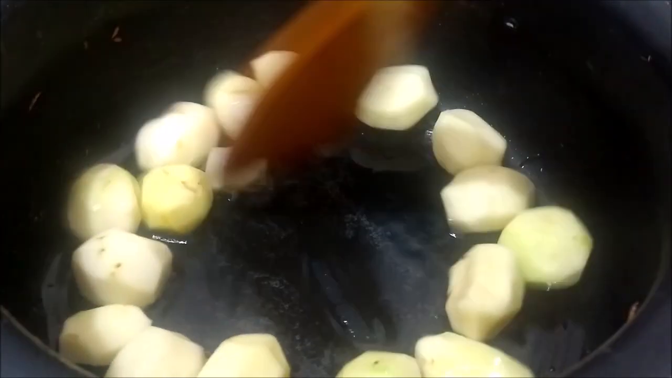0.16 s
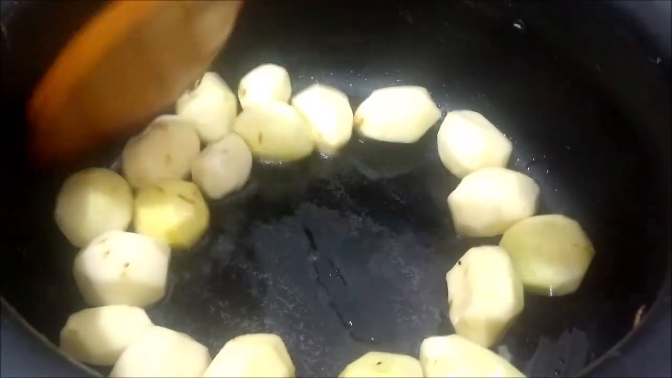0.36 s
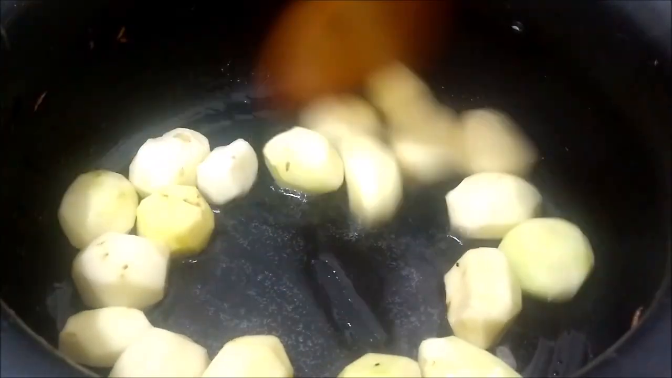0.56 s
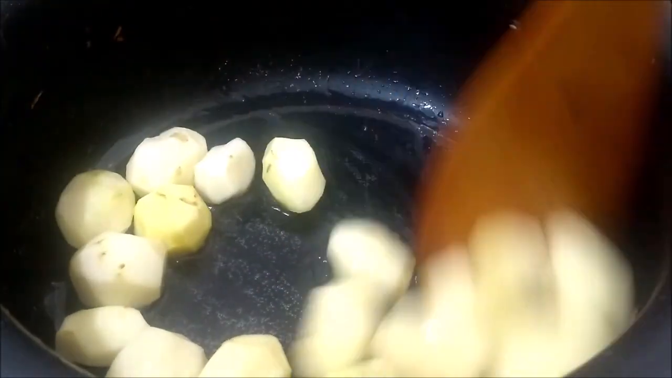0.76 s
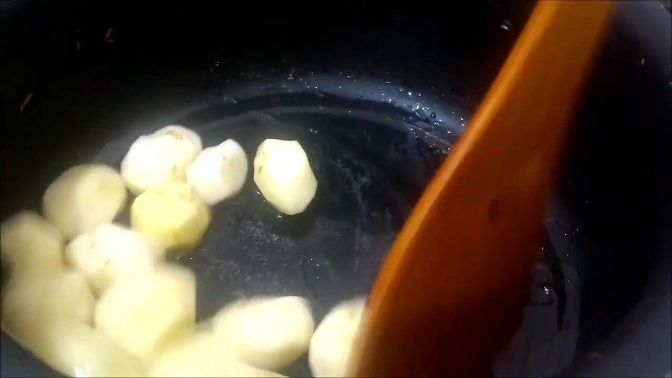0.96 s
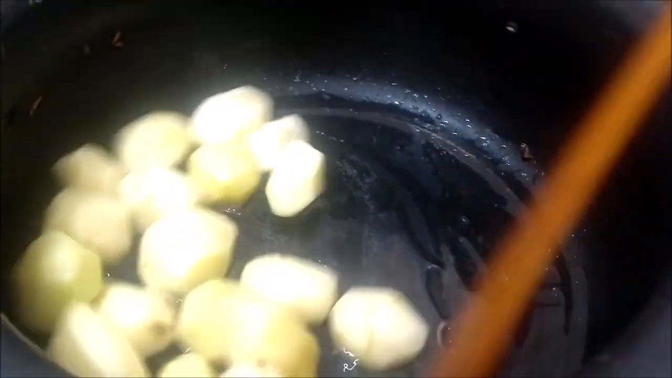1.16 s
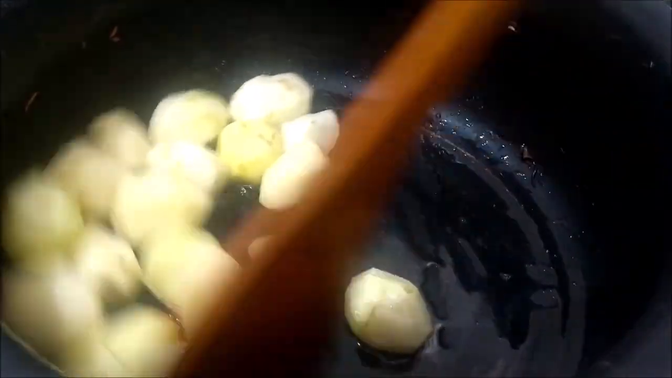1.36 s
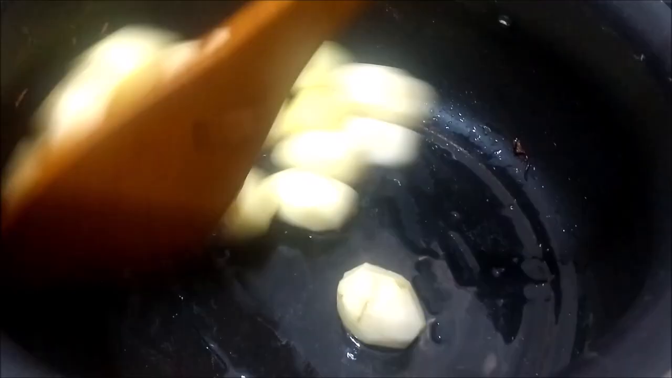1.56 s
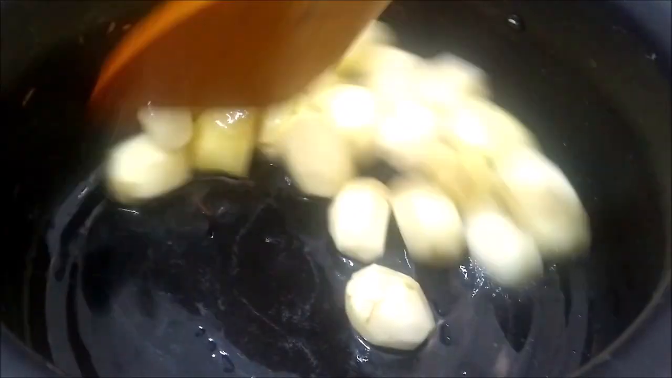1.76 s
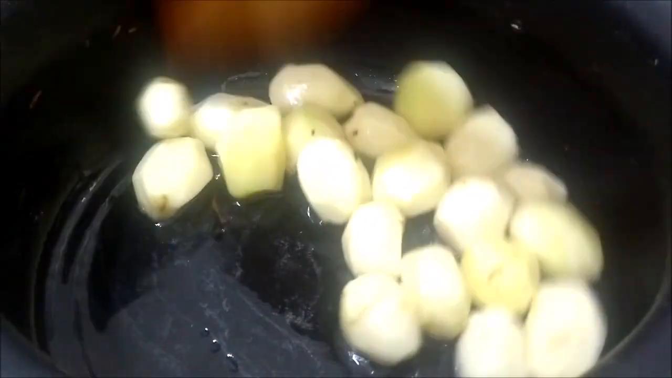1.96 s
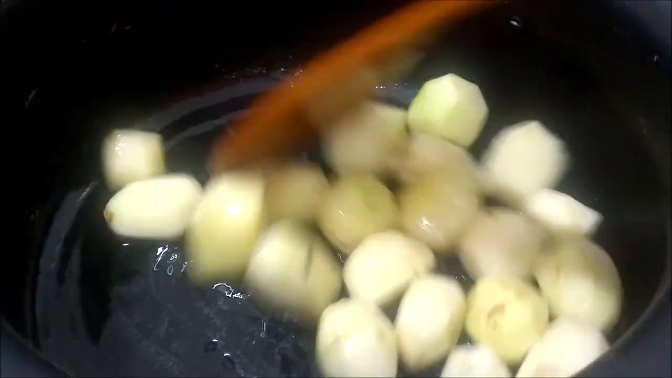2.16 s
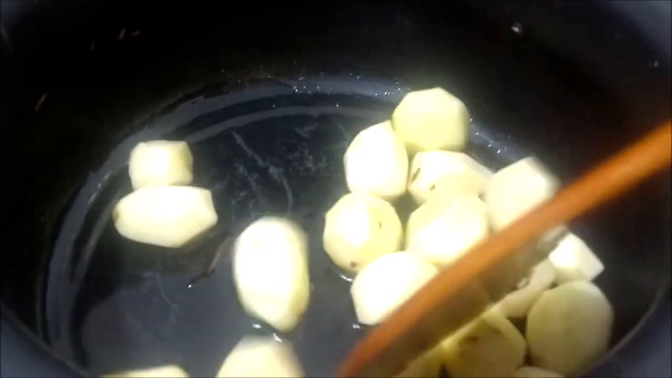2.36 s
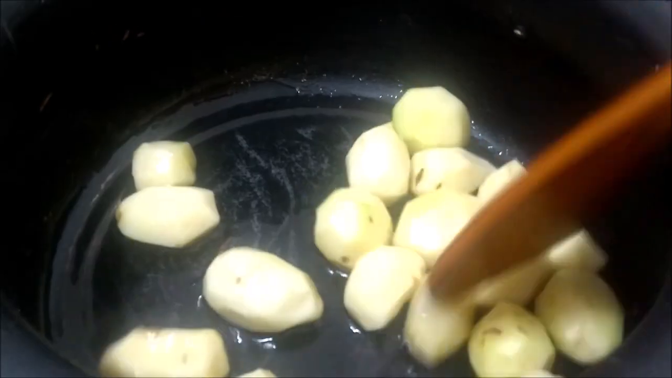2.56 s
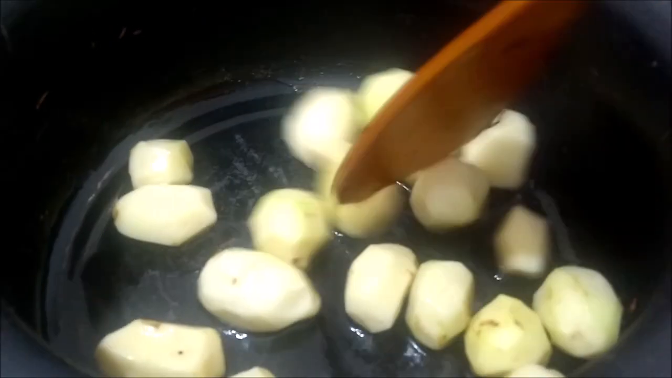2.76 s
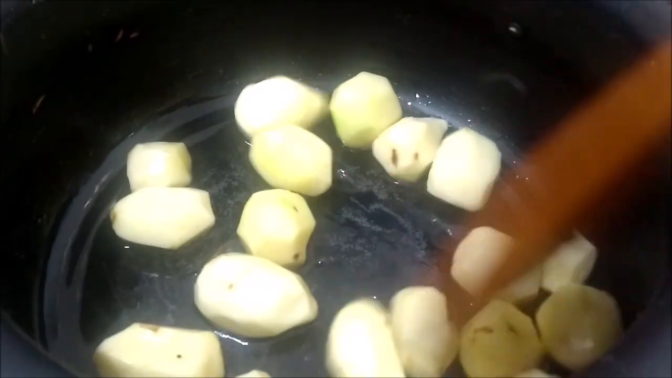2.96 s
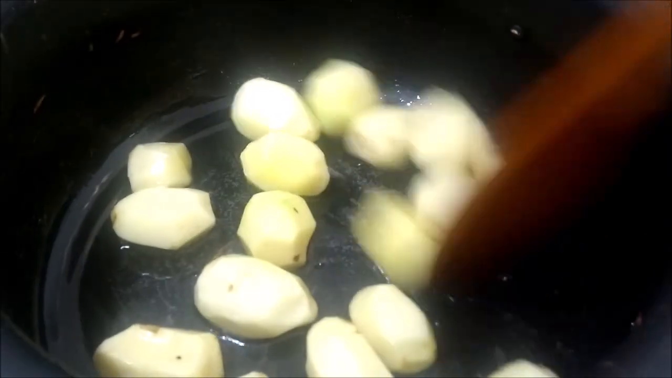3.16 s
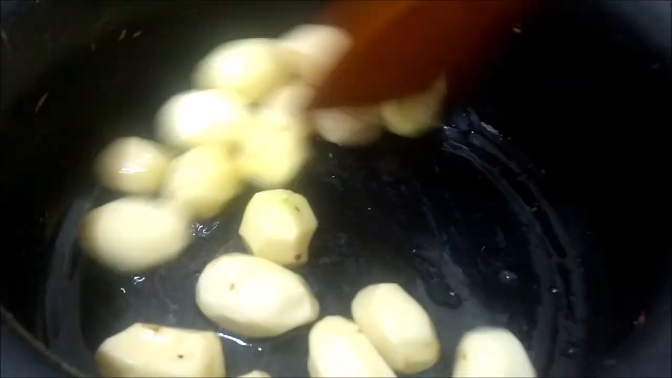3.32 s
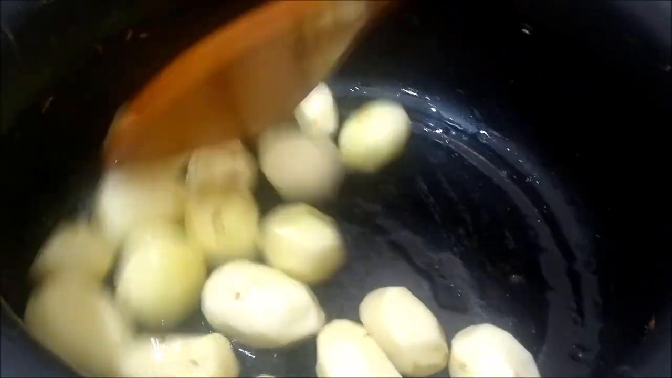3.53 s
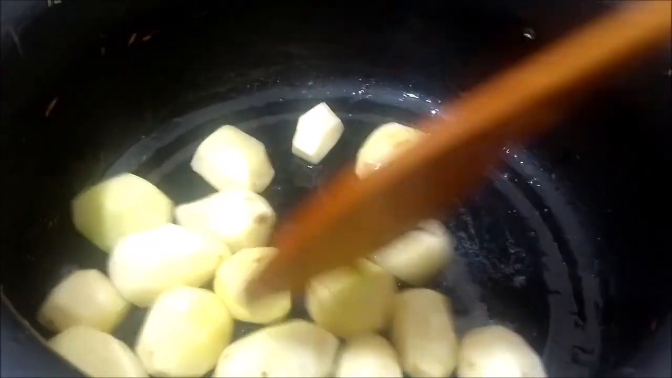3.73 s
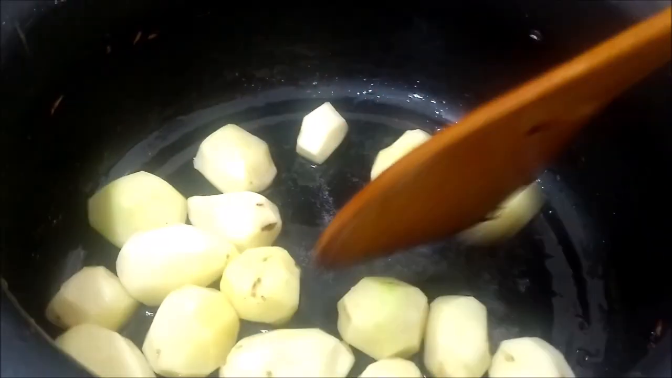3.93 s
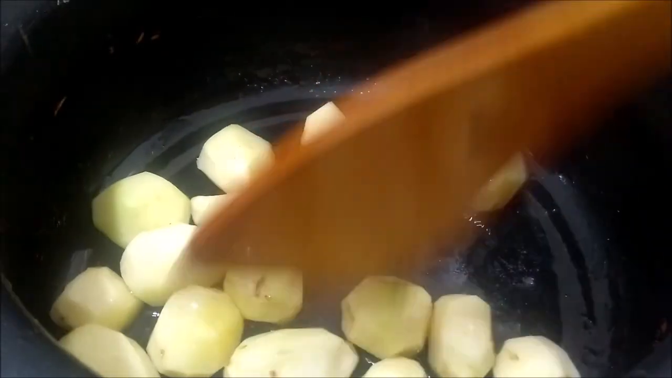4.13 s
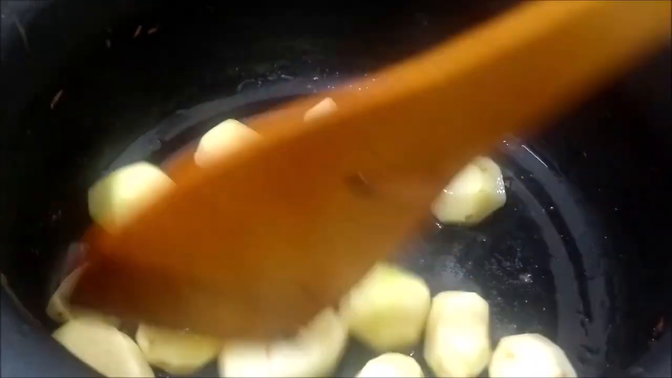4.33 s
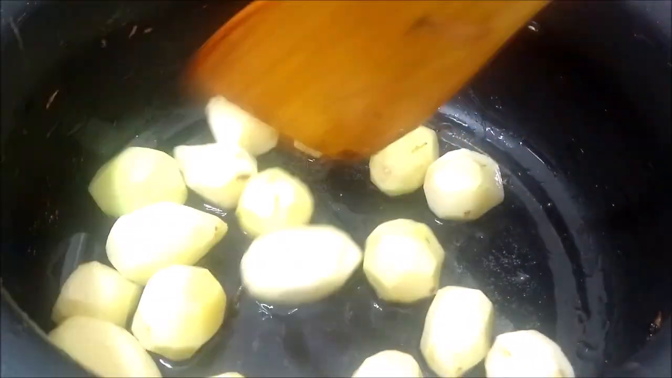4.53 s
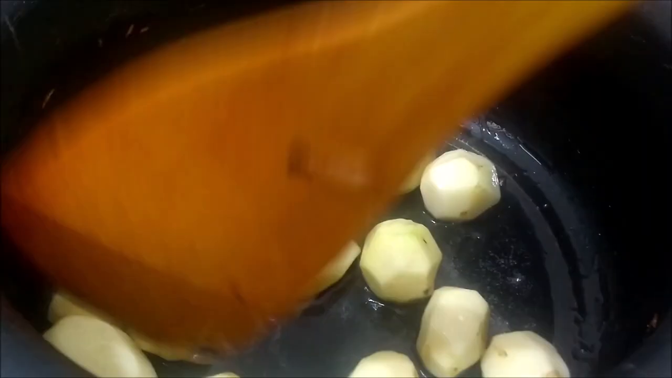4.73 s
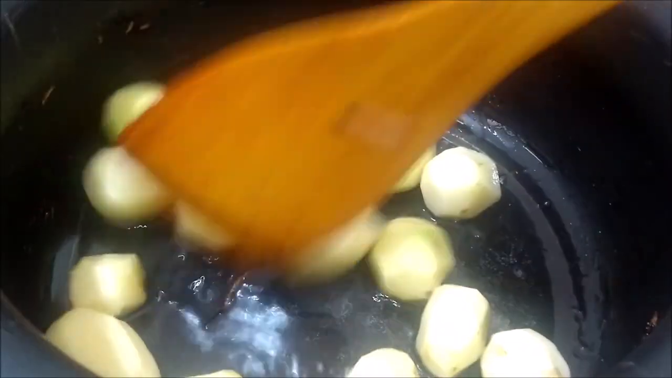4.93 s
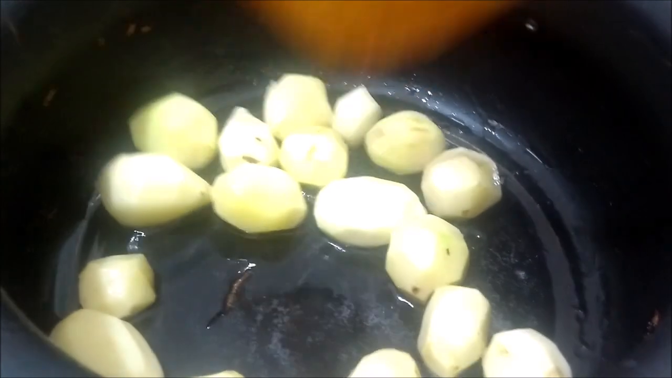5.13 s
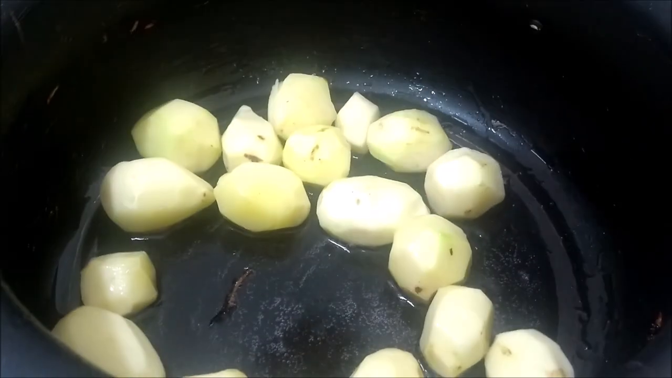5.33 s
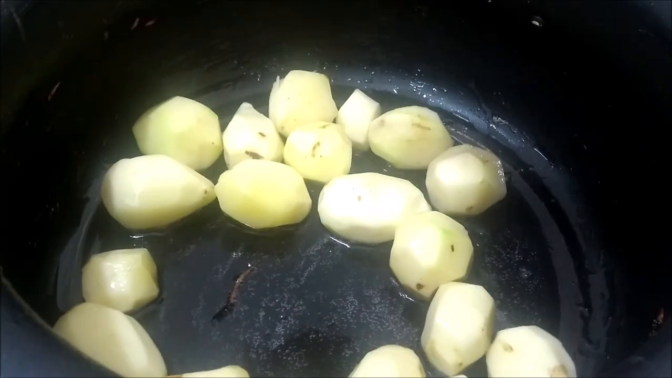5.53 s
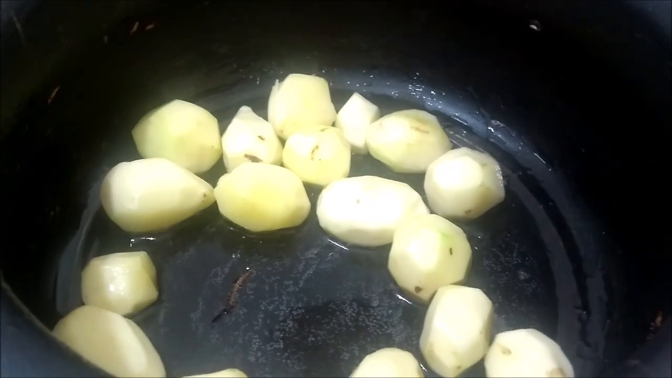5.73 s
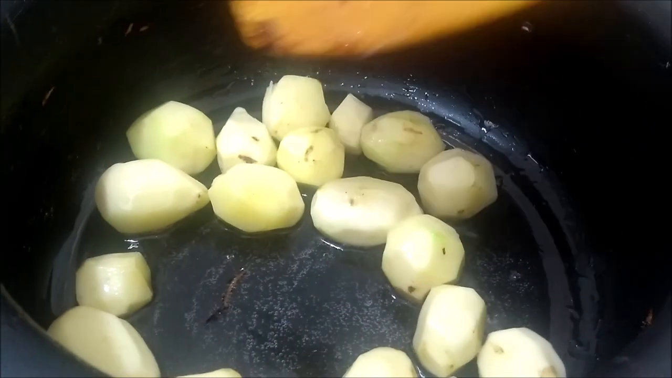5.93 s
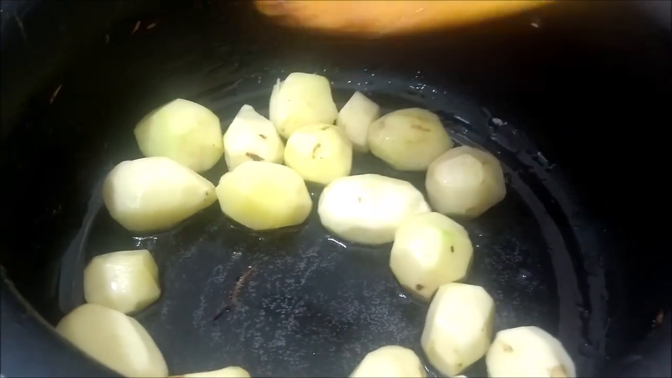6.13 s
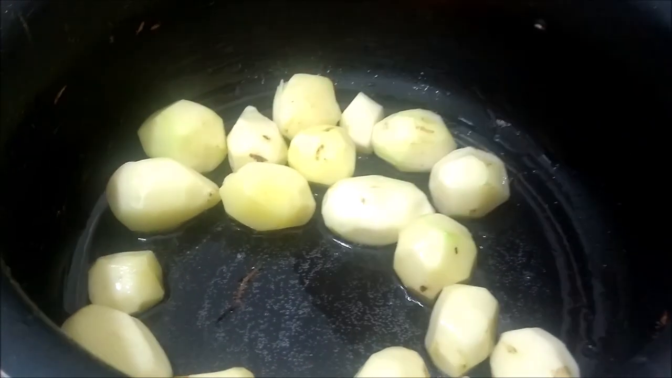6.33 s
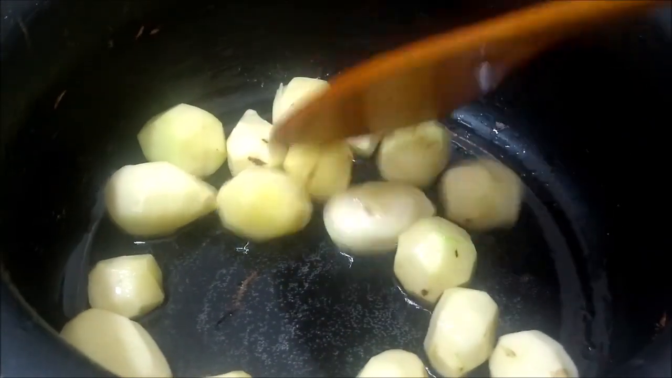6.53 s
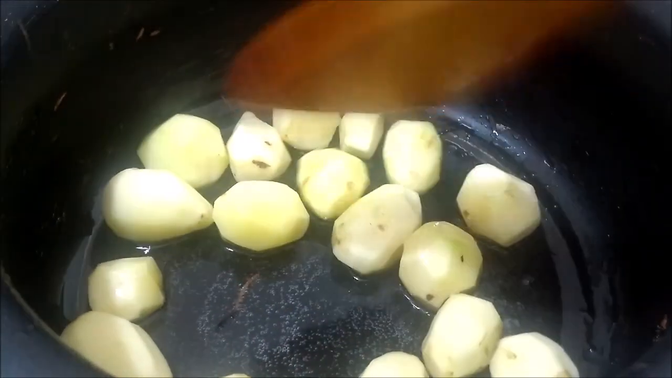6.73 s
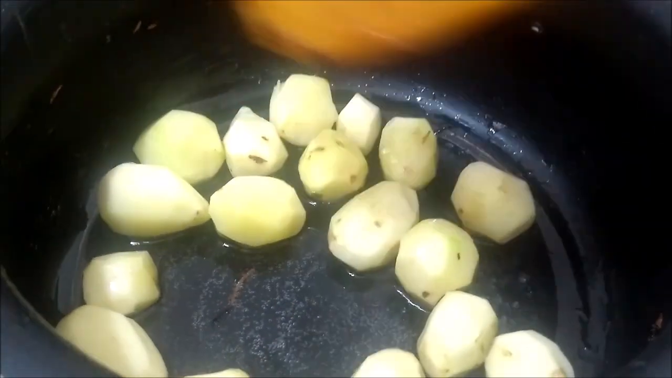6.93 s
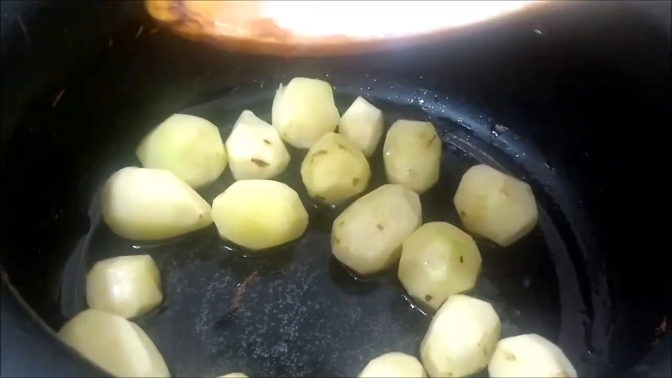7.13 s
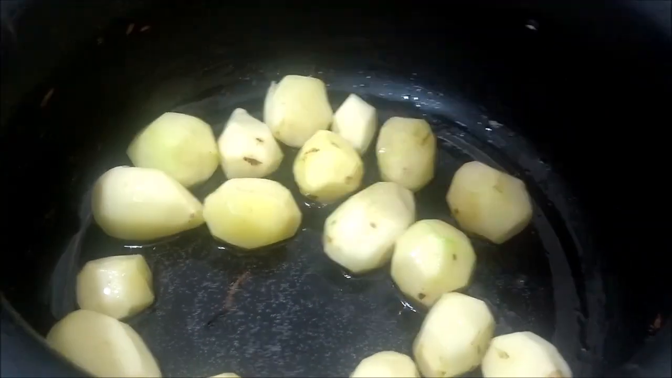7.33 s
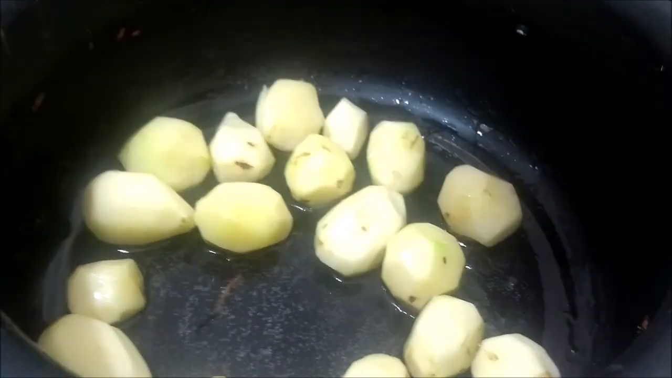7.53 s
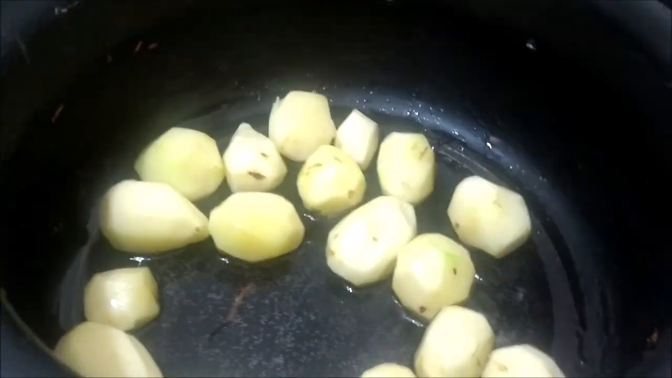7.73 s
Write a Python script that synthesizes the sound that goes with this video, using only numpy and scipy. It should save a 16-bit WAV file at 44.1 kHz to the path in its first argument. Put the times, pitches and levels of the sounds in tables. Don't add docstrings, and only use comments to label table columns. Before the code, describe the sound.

Potatoes fry in hot oil with a dense, crackling sizzle while a wooden spatula knocks and scrapes the ringing metal pan, close up.

```python
import sys
import numpy as np
from scipy import signal
from scipy.fft import rfft, irfft, next_fast_len
from scipy.io import wavfile
from scipy.ndimage import uniform_filter1d, map_coordinates

SR = 44100
rng = np.random.default_rng(int(sys.argv[2]) if len(sys.argv) > 2 else 0)


def voltage_ratio(level):
    return 10 ** (np.asarray(level, float) / 20)


def file_out(sig):
    cols = np.atleast_2d(sig).T
    lim = np.clip(cols, -1, 1)
    pcm = np.round(lim * 32767).astype(np.int16)
    wavfile.write(sys.argv[1], SR, pcm)


N = 347508


def unit(x):
    return x / np.sqrt(np.mean(x ** 2) + 1e-20)


def along(points, hz):
    f, v = np.transpose(points)
    return np.interp(np.log(hz + 1), np.log(f + 1), v)


def curves(rows):
    s, *cols = np.transpose(rows)
    return [np.interp(np.arange(N) / SR, s, c) for c in cols]


def wobble(knots_per_s):
    knots = rng.standard_normal(int(N * knots_per_s / SR) + 4)
    return map_coordinates(knots, [np.arange(N) * knots_per_s / SR])


def swell(s, rise_s, length_s):
    t = np.arange(N) / SR
    return np.exp(-np.where(t < s, (s - t) / rise_s, (t - s) / length_s) ** 2)


def filtered(x, response):
    m = next_fast_len(N + SR // 2)
    return irfft(rfft(x, m) * response(np.fft.rfftfreq(m, 1 / SR)), m)[..., :N]


def resonances(modes):
    def response(f):
        total = 0
        for k, (hz, width, db) in enumerate(modes):
            loss = 1j * f * width
            total = total + (-1) ** k * voltage_ratio(db) * loss / (hz * hz - f * f + loss)
        return total
    return response


def patchy(patchy_db):
    z = signal.stft(rng.standard_normal((2, N)), nperseg=512)[2]
    field = uniform_filter1d(uniform_filter1d(rng.standard_normal(z.shape[1:]), 10, 0), 7, 1)
    return unit(signal.istft(z * voltage_ratio(patchy_db * unit(field)), nperseg=512)[1][:, :N])


def bubbles(count, centre_hz, spread, cycles, size_db):
    pitch, size, place, stream = rng.random((count, 4)).T[:, :, None]
    hz = np.clip(centre_hz * np.exp(spread * np.log(pitch / (1 - pitch))), 500, 15000)
    t = np.arange(96) / SR
    rise = t * hz / cycles
    level = voltage_ratio(np.minimum(-size_db * np.log(size), 13))
    grain = level * rise * np.exp(-rise * 2) * np.sin(2 * np.pi * hz * t)
    start = (place * (N - 96)).astype(int) + N * (stream < .5)
    return unit(np.bincount((start + np.arange(96)).ravel(), grain.ravel(), 2 * N).reshape(2, N))


def sparse_pushes(share, size_db):
    out = np.zeros(2 * N)
    place, sign, size = rng.random((40000, 3))[:int(share * 2 * N)].T
    push = np.sign(sign - .5) * voltage_ratio(np.minimum(-size_db * np.log(size), 11))
    out[(place * 2 * N).astype(int)] = push
    return unit(out.reshape(2, N))


# (time [s], level [dB], large bubbles over fine [dB])
FRYING = [(0.04, -49, 0), (0.17, -51, -5), (0.78, -39.5, -6.5), (1.18, -39.5, -7), (1.24, -34.5, -7.5),
          (1.41, -37.5, -5.5), (1.68, -30, -5), (2.29, -32, -5.5), (2.46, -36, -4.5), (2.88, -32.5, -6.5),
          (3.01, -36, -4), (3.4, -31, -7), (4.01, -34.5, -6.5), (6.31, -37, -2), (6.61, -34, -3.5),
          (6.68, -37, -5), (7.84, -35, -5.5), (7.88, -33.5, -8)]
# (time [s], rise [dB], length [s])
FLARES = [(0.155, 3, 0.086), (0.326, 2, 0.017), (0.52, 3, 0.19), (0.9, 4, 0.021), (1.26, -1.5, 0.082),
          (1.5, -1.5, .06), (2.838, 1.5, .1), (3.241, 5.5, 0.052), (3.394, 1.5, 0.16), (3.51, 0.5, 0.062),
          (3.563, 1.5, .04), (3.928, 3.5, 0.084), (4.635, 2, 0.034), (4.743, 2, 0.023), (5.17, 0.5, .04),
          (5.49, -0.5, 0.058), (5.758, 5, 0.026), (6.263, 2.5, .05), (6.537, 2.5, .015),
          (6.578, 3.5, 0.059), (6.975, 4, 0.1)]
FLARE_RISE_S, FLARE_LARGE_SHARE = 0.014, 0.56


def frying():
    fizz_db, large_db = curves(FRYING)
    flare_db = sum(db * swell(s, FLARE_RISE_S, length_s) for s, db, length_s in FLARES)
    return fizz_db + large_db + FLARE_LARGE_SHARE * flare_db, fizz_db + flare_db


# (frequency [Hz], density [dB per Hz])
LARGE_FIZZ = [(300, -16.5), (700, -35), (1400, -6.5), (2300, -2.5), (3500, -2), (5200, 0), (7000, -4.5),
              (9500, -23), (14500, -42)]
FINE_FIZZ = [(3000, -70), (5500, -15), (8000, -4), (9500, -4), (11500, 0), (13000, 0), (14500, -6)]


def sizzle():
    large_db, fine_db = frying()
    flare = wobble(24)
    large_flicker_db = 0.3 * flare + 1.1 * wobble(35)
    fine_flicker_db = 0.11 * flare + 0.79 * wobble(30)
    large_bursts = bubbles(count=5000, centre_hz=4510, spread=0.195, cycles=2.7, size_db=3.5)
    fine_bursts = bubbles(count=16000, centre_hz=10430, spread=0.14, cycles=2.6, size_db=-0.5)
    large = patchy(patchy_db=1.5) + voltage_ratio(-13.5) * large_bursts
    fine = patchy(patchy_db=2.1) + voltage_ratio(-8) * fine_bursts
    large = unit(filtered(large, lambda f: voltage_ratio(along(LARGE_FIZZ, f))))
    fine = unit(filtered(fine, lambda f: voltage_ratio(along(FINE_FIZZ, f))))
    return voltage_ratio(large_db + 4.0 + large_flicker_db) * large + voltage_ratio(fine_db + 2.0 + fine_flicker_db) * fine


# (time [s], peak [dB], pitch [Hz])
SPITS = [(0.0152, -14, 3000), (0.311, -31, 3290), (0.9076, -19, 12800), (1.253, -21, 11250),
         (2.0157, -14, 7760), (2.5847, -23.5, 3830), (2.8337, -16.5, 11060), (3.0509, -25, 5750),
         (3.1154, -20.5, 5600), (3.2534, -23, 10600), (3.2908, -21, 3770), (3.7099, -19, 10700),
         (3.9204, -26, 12400), (4.3803, -23, 5600), (4.4085, -23, 5500), (4.4604, -20, 5600),
         (4.7423, -23, 3600), (5.0634, -23, 5900), (5.1715, -18, 5640), (5.6606, -26, 3720),
         (5.868, -15.5, 8050), (6.2072, -21, 5520), (6.2483, -22, 3980), (6.46, -19, 8700),
         (6.523, -24, 3400), (6.6167, -21, 5900), (6.8543, -20, 6420), (6.8785, -22, 11500),
         (1.1425, -25.5, 5700), (1.6224, -22, 3870), (2.4939, -32, 5740), (3.1694, -24, 3720),
         (3.5964, -20.5, 3550), (3.8338, -29, 5560), (4.644, -20, 5170), (5.9016, -28, 3670),
         (5.947, -22, 5230), (5.9925, -29, 5630), (6.267, -22.5, 3060), (7.3683, -31, 3440),
         (7.71, -21, 7860)]


def spits():
    out, t = np.zeros((2, N + 900)), np.arange(900) / SR
    for s, db, hz in SPITS:
        tone = np.sin(2 * np.pi * hz * t) * (1 - np.exp(-t / 0.00042))
        tick = tone * voltage_ratio(-60 * t / 0.014) * [[1], [.4]]
        splash = voltage_ratio(-60 * t / 0.016) * uniform_filter1d(rng.standard_normal((2, 900)), size=7) * tone
        out[:, round(s * SR):][:, :900] += voltage_ratio(db + 1.5) * (tick + 2.46 * splash)
    return out[:, :N]


# (time [s], peak [dB], t60 [s], centre [Hz])
SNAPS = [(0.0148, -29, 0.01, 3500), (0.31, -23, 0.025, 4940), (0.513, -26, .012, 2800),
         (0.907, -23, 0.02, 11000), (1.0842, -15, .01, 3000), (1.253, -32, .012, 10000),
         (3.534, -24, .008, 2000), (3.875, -24, 0.0074, 2000), (3.921, -22, .02, 10000),
         (4.7415, -14, .008, 2800), (5.172, -15, 0.007, 5000), (5.762, -16, .006, 11500),
         (5.87, -19, .006, 10500), (6.288, -9.5, 0.0036, 3800), (6.5232, -13, 0.028, 3300),
         (6.53, -10, .006, 6000)]


def snaps():
    out, t = np.zeros((2, N + 1500)), np.arange(1500) / SR
    for s, db, t60_s, hz in SNAPS:
        onset = 1 - np.exp(-t / (0.16 * t60_s))
        shape = voltage_ratio(db + 5.5 - 60 * t / t60_s + np.array([[0], [-3]])) * onset
        band = signal.butter(1, [hz / 3.9, min(hz * 2.2, SR / 2.1)], "band", fs=SR)
        out[:, round(s * SR):][:, :1500] += signal.lfilter(*band, shape * rng.standard_normal((2, 1500)))
    return out[:, :N]


# (time [s], peak [dB], pitch [Hz])
PLOPS = [(0.795, -21.5, 1050), (0.829, -23, 1060), (0.892, -19, 1090), (1.021, -24.5, 1070),
         (1.28, -23, 1060), (1.495, -23, 1050), (1.579, -21.5, 1020), (1.725, -31, 1090),
         (1.827, -26, 1080), (2.084, -23, 1030), (2.14, -25, 1017), (2.228, -23, 1010), (2.272, -25, 1020),
         (2.291, -21, 1030), (2.308, -22, 1050), (2.38, -27, 1060), (2.454, -22, 1084), (2.465, -25, 1080),
         (2.716, -23.5, 1020), (2.936, -31, 1080), (3.334, -38, 1080), (3.429, -28, 1140),
         (3.714, -24, 1017), (3.897, -26, 988), (3.996, -22, 1000), (4.08, -23, 1040), (4.329, -25.5, 1040),
         (4.667, -23, 1070), (4.684, -18.5, 1040), (4.722, -28, 1080), (4.978, -19.5, 1040),
         (5.003, -25, 1050), (5.043, -26, 1040), (5.063, -28, 1045), (5.172, -28, 1060), (5.253, -26, 1080),
         (5.654, -26, 1050), (5.921, -24, 1070), (6.131, -27, 1050), (6.274, -14.5, 1075),
         (6.429, -27, 1110), (6.63, -26, 1036), (6.669, -24.5, 1020), (6.729, -35, 1050),
         (7.212, -21, 1100), (7.271, -26, 1090), (7.369, -35, 1120), (7.635, -21.5, 1090),
         (7.801, -25, 1080)]
PLOP_WIDTH_HZ, PLOP_DUCK_SHARE = 188, 0.69


def plops():
    out, t = np.zeros((2, N + 900)), np.arange(900) / SR
    rise = np.pi * PLOP_WIDTH_HZ * t
    envelope = (rise / 2) ** 2 * np.exp(2 - rise)
    for s, db, hz in PLOPS:
        out[0, round(s * SR):][:900] += voltage_ratio(db - 0.5) * envelope * np.sin(2 * np.pi * hz * t)
    return out[:, :N]


def ducking():
    out = np.ones(N + 900)
    for s, _, _ in PLOPS:
        out[round(s * SR) - 250:][:900] *= 1 - PLOP_DUCK_SHARE * np.hanning(900)
    return out[:N]


# (time [s], wall ring [dB], bowl air [dB], ring centre [Hz], freedom to ring [0-1.3])
KNOCKS = [(0.0148, -4.5, -7, 595, 0.11), (0.085, -25, -32, 580, 0.47), (0.309, -32.5, -42.5, 465, 1),
          (0.5125, -28.5, -26, 430, 0.15), (0.759, -26, -31, 590, 0.7), (0.867, -28, -23.5, 550, 0.1),
          (1.085, -14, -11.5, 480, 0.32), (1.289, -32, -31, 486, 0.8), (1.51, -28.5, -21, 580, 0.35),
          (1.923, -22, -19, 433, 0.65), (2.019, -32, -45, 447, 0.2), (2.108, -28, -23, 490, 0.44),
          (2.36, -27, -19, 430, 0.17), (2.851, -35, -48, 500, 1), (3.027, -24.5, -28.5, 365, 0.6),
          (3.279, -28.5, -47, 415, 0.2), (3.498, -25, -30, 395, 0.5), (3.533, -18.5, -23, 385, 0.12),
          (3.874, -22.5, -31, 535, 0.56), (4.374, -43, -28.5, 457, 0), (7.455, -33.5, -45, 450, 0.1),
          (4.7422, -17.5, -20, 412, 1.3), (6.524, -20, -35, 480, 0.35)]
# (level re air [dB], centre [Hz], freedom [0-1])
PLOP_WALL = (-19.5, 600, 0.15)


def contacts():
    under_db, centre_hz, free = PLOP_WALL
    rows = [(*row, False) for row in KNOCKS]
    return rows + [(s, db - 1 + under_db, db - 5, centre_hz, free, True) for s, db, _ in PLOPS]


def rattle(column):
    out, t = np.zeros(N + SR), np.arange(SR // 2) / SR
    for row in contacts():
        t60_s = 0.083 + 0.56 * max(row[4], 0)
        out[round(row[0] * SR):][:len(t)] += voltage_ratio(row[column] - 60 * t / t60_s)
    return out[:N]


# (time [s], effort [dB], wall region scraped [Hz])
STIR = [(0.1, -42.5, 563), (0.49, -43, 440), (0.92, -34.5, 506), (1.2, -37, 418), (1.48, -34.5, 535),
        (1.62, -46, 473), (1.81, -39.5, 530), (1.94, -34.5, 435), (2.3, -43.5, 414), (2.82, -45, 480),
        (3.07, -46.5, 411), (3.31, -37.5, 427), (3.82, -41, 496), (4.24, -40.5, 527), (4.63, -42, 540),
        (4.9, -46, 435), (5.39, -46, 470), (7.88, -45.5, 525)]
# (time [s], rise [dB], length [s], wall region [Hz])
RUBS = [(0.328, -7, 0.07, 485), (0.76, -1, .04, 554), (1.12, 3.5, .07, 427), (1.3, 8, 0.05, 530),
        (1.718, 7, 0.1, 560), (1.992, 2, .1, 400), (2.36, 5, 0.084, 397), (2.862, 5.5, 0.081, 450),
        (3.04, 9.5, 0.2, 396), (3.55, 8, 0.054, 390), (3.607, 9.5, 0.1, 500), (4.34, 9, 0.031, 506),
        (4.904, 5, 0.12, 430), (6.544, 14, 0.12, 445)]
# (time [s], frequency [Hz], level [dB])
AIR = [(0.5, 1105, -2), (0.72, 1030, 1), (0.93, 1165, -0.5), (1.57, 1044, 0), (1.98, 1108, 2),
       (2.2, 996, -2.5), (2.46, 1117, 3.5), (2.8, 983, 2), (2.96, 1092, -1), (3.28, 1047, 0),
       (3.45, 1140, -1.5), (3.68, 1017, 0), (4.4, 1088, 3.5), (4.95, 1015, 0), (5.4, 1082, 1.5),
       (6.42, 1071, 0), (6.67, 993, 3), (7.0, 1084, 3.5)]
RUB_RISE_S, AIR_DRIFT_HZ, REGION_DRIFT_HZ = 0.008, 26, 24.8


def stirring():
    (effort_db, region_hz), (air_hz, _) = curves(STIR), curves(AIR)
    region_hz = region_hz + REGION_DRIFT_HZ * wobble(6)
    for s, db, length_s, hz in RUBS:
        shape = swell(s, RUB_RISE_S, length_s)
        effort_db = effort_db + db * shape
        region_hz = region_hz + (hz - region_hz) * shape
    return effort_db, region_hz, air_hz + AIR_DRIFT_HZ * wobble(7)


# (frequency [Hz], width [Hz], level [dB])
BOWL = [(561, 123, -11.5), (972, 180, -7.5), (1102.5, 49, 3.5), (1615, 26, -11.5), (2634, 24, -10.5)]
HUM_MEAN_DB, HUM_PER_LARGE_DB, HUM_PER_EFFORT_DB = -38, 0.52, 0.062


def bowl_hum(effort_db, air_hz):
    large_db = sum(curves(FRYING))
    hum_db = HUM_MEAN_DB + curves(AIR)[1] + HUM_PER_LARGE_DB * (large_db - large_db.mean())
    hum_db = hum_db + HUM_PER_EFFORT_DB * (effort_db - effort_db.mean())
    push = patchy(patchy_db=1.5) + voltage_ratio(-4.5) * sparse_pushes(share=.004, size_db=1.0)
    main_db = max(db for _, _, db in BOWL)
    lowered = [(hz * 0.942 if db == main_db else hz, width, db) for hz, width, db in BOWL]
    low_air = unit(filtered(push[::-1], resonances(lowered)))
    high_air = unit(filtered(push, resonances(BOWL)))
    turn = np.pi / 2 * np.clip((air_hz - 1000) / 110, .05, .95)
    air = np.cos(turn) * low_air + np.sin(turn) * high_air
    gain = voltage_ratio(hum_db - 1.0 + 0.45 * wobble(25)) + voltage_ratio(-14.0) * rattle(column=2)
    return gain * ducking() * air


# (frequency [Hz], level [dB], t60 [s])
WALL = [(245.5, -18.5, 0.12), (329.8, -5.5, 0.46), (371.7, -6, 0.48), (410.5, -0.5, 0.8), (453, 3, 0.44),
        (510, 4, 0.31), (554, 2.5, 0.25), (667, -10.5, 0.16), (730, -13, 0.09), (1050, -4.5, 0.31),
        (1460, -11.5, 0.083), (1590, -11, .09)]


def wall_scrape(effort_db, region_hz):
    rub = patchy(patchy_db=2.5) + voltage_ratio(-3.5) * sparse_pushes(share=.002, size_db=4.5)
    modes = [(hz, 5 / t60_s, db) for hz, db, t60_s in WALL if hz < 800]
    low = unit(filtered(rub, resonances(modes[:4])))
    high = unit(filtered(rub, resonances(modes[4:])))
    turn = np.pi / 2 * np.clip((region_hz - 340) / 240, .1, .9)
    gain = voltage_ratio(effort_db - 2.5 + 0.9 * wobble(6.2)) + voltage_ratio(-14.0) * rattle(column=1)
    return gain * (np.cos(turn) * low + np.sin(turn) * high)


def pan():
    effort_db, region_hz, air_hz = stirring()
    return bowl_hum(effort_db, air_hz) + wall_scrape(effort_db, region_hz)


CONTACT_S = 0.001227
SETTLE_S, SETTLED_DB_PER_S = 0.12, 104
KNOCK_DAMP_HZ = 58


def knocks():
    out, blows, t = np.zeros((2, N + SR)), np.zeros((2, N)), np.arange(14000) / SR
    hz, level_db, t60_s = np.transpose(WALL)[:, :, None]
    phase = 2 * np.pi * hz * t
    swing = np.array([np.sin(phase), np.cos(phase)]) * (1 - np.exp(-t / 0.0013))
    settled_db = SETTLED_DB_PER_S * np.maximum(t - SETTLE_S, 0)
    for s, ring_db, air_db, centre_hz, free, plop in contacts():
        start, crack_start = round((s + CONTACT_S) * SR), round((s + .6 * CONTACT_S) * SR)
        near_db = -(80 + 500 * free ** 2) * np.log(hz / centre_hz) ** 2
        near_db = np.maximum(near_db, -11 - 8 * free) * (hz < 600)
        fade_db = -60 * t / (t60_s * np.clip(free, .05, 2)) - settled_db
        scatter_db = rng.normal(0, 0.87, (2, len(hz), 1)) + [[[0]], [[-4]]]
        size = voltage_ratio(level_db + near_db + scatter_db) * voltage_ratio(fade_db)
        crack = voltage_ratio(-24.0 - 60 * t[:600] / 0.007) * rng.standard_normal((2, 600))
        out[:, start:][:, :len(t)] += voltage_ratio(ring_db - 3.5 + 2.1 * free) * (size * swing).sum(1)
        out[:, crack_start:][:, :600] += voltage_ratio(max(ring_db, air_db) + 3.0) * crack
        blows[:, start] = voltage_ratio(air_db + 41) * (not plop), voltage_ratio(ring_db + 34.0 - 13 * free)
    damped_air = resonances([(c, width + KNOCK_DAMP_HZ, db) for c, width, db in BOWL])
    puff = lambda f: damped_air(f) / (1 + 1j * f / 2500)
    thud = resonances([(140, 410, -16.0), (480, 450, 2.0), (790, 350, -5), (3000, 320, -37)])
    out[0, :N] += filtered(blows, lambda f: np.array([puff(f), thud(f)])).sum(0)
    return out[:, :N]


# (frequency [Hz], density [dB per Hz])
RUMBLE = [(20, -13), (45, -6), (100, -1), (170, 1), (260, 0.5), (450, -17), (800, -4), (1500, -54)]
# (frequency [Hz], width [Hz], level [dB])
FLAME = [(63, 10, -10), (102.3, 2.7, 5.5), (156.3, 26, -2.5), (187.5, 22, -0.5)]
# (time [s], level [dB])
ROCKS = [(0.45, -61), (0.72, -58), (1.09, -54), (1.4, -48), (1.93, -45), (2.0, -54), (2.36, -53),
         (2.86, -60), (3.03, -52), (3.22, -48), (3.379, -46), (3.5, -48.5), (3.87, -46), (4.32, -75),
         (4.76, -46), (5.0, -61), (5.7, -69), (6.52, -42.5), (7.15, -83)]
RUMBLE_REST_DB, RUMBLE_PER_FIZZ_DB, ROCK_T60_S = -56.5, 0.7, 0.96


def burner():
    fizz_db, t = curves(FRYING)[0], np.arange(N) / SR
    rocking = sum((t > s) * voltage_ratio(db - 60 * np.abs(t - s) / ROCK_T60_S) for s, db in ROCKS)
    level = voltage_ratio(RUMBLE_REST_DB + RUMBLE_PER_FIZZ_DB * (fizz_db - fizz_db.mean())) + rocking
    roar = unit(filtered(patchy(patchy_db=0.5), lambda f: voltage_ratio(along(RUMBLE, f))))
    flutter = unit(filtered(rng.standard_normal((2, N)), resonances(FLAME)))
    gusts_db = 1.8 * wobble(8)
    return level * voltage_ratio(2.0 + gusts_db) * unit(roar + voltage_ratio(0.5) * flutter)


# (frequency [Hz], density [dB per Hz])
HISS = [(500, -11), (2000, -6), (4500, -4.5), (9000, -8), (14500, -16)]


def microphone_hiss():
    return voltage_ratio(-53) * unit(filtered(rng.standard_normal((2, N)), lambda f: voltage_ratio(along(HISS, f))))


# (frequency [Hz], likeness [0-1])
ALIKE = [(60, 0.76), (130, 0.54), (260, 0.28), (500, 0.61), (880, 0.98), (1200, 1), (1650, 0.48), (2120, 1),
         (2500, 0.93), (2800, 0.12), (3450, 1), (4100, 0.25), (4450, 0.82), (4950, 0.58), (5500, 0.82),
         (7100, 0.16), (8500, 0.34), (14000, 0.59)]
# (frequency [Hz], left minus right [dB])
TILT = [(60, -1), (200, -4.5), (370, -6), (680, .5), (1250, 0), (2300, -.8), (4220, -3), (7750, -5),
        (14200, -7)]
# (frequency [Hz], left lead [rad])
LEAD = [(0, -3), (220, -2.6), (340, .5), (700, .3), (880, 0), (1300, 0), (1750, -1.45), (2150, -3.05),
        (2500, -3.2), (3100, -6), (3800, -6.5), (4450, -9.2), (4950, -9.7), (8270, -18.6), (14400, -33.9)]


def ports(pair, slant=1):
    turn = lambda f: np.arccos(np.clip(along(ALIKE, f), 0, 1)) / 2
    mid, side = filtered(pair, lambda f: np.array([np.cos(turn(f)), np.sin(turn(f))]))
    lead = lambda f: np.interp(f, *np.transpose(LEAD)) * np.where(f > LEAD[5][0], slant, 1)
    skew = lambda f: voltage_ratio(along(TILT, f) / 2) * np.exp(.5j * lead(f))
    late = lambda f: np.exp(-.5j * lead(np.minimum(f, LEAD[2][0])))
    both = np.array([mid + side, mid - side])
    return filtered(both, lambda f: late(f) * np.array([skew(f), 1 / skew(f)]))


SPATULA_SLANT, SPREAD_SLANT = 0.81, 0.029


def scene():
    oil = sizzle() + spits() + plops() + pan() + burner()
    near = np.clip(.5 + 0.48 * wobble(4), 0, 1)
    frying_heard = ports(near * oil, 1 + SPREAD_SLANT) + ports((1 - near) * oil, 1 - SPREAD_SLANT)
    return frying_heard + ports(knocks() + snaps(), SPATULA_SLANT) + microphone_hiss()


def low_pass(x):
    return signal.sosfilt(signal.butter(12, 14840, fs=SR, output="sos"), x)


def record(dry):
    x = filtered(dry, lambda hz: hz < 14250)
    x = x / (1 + np.abs(x) ** 8) ** (1 / 8)
    return low_pass(x)


dry = scene()
out = record(dry)
file_out(out)
```